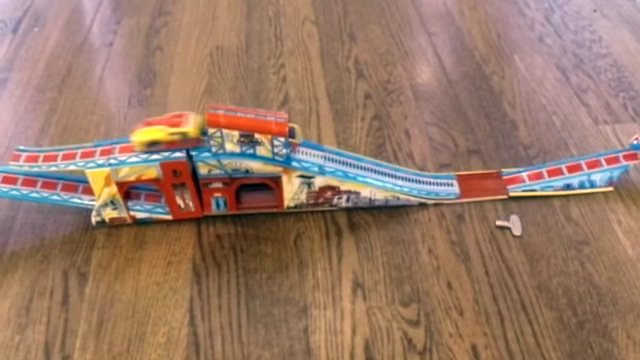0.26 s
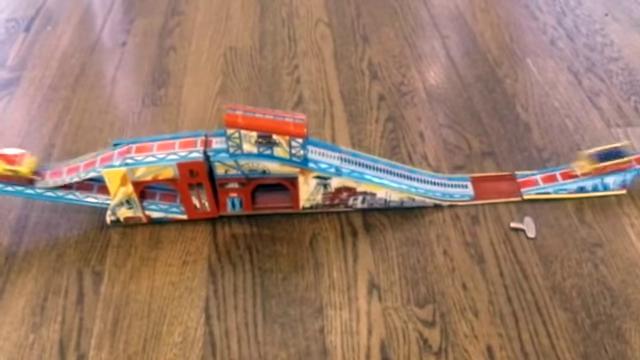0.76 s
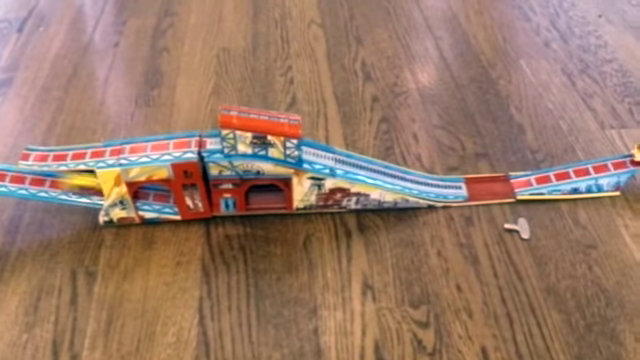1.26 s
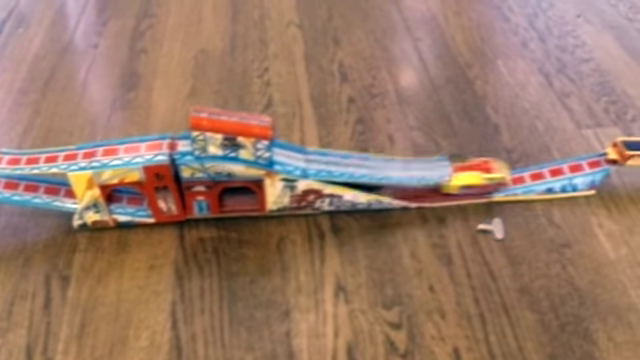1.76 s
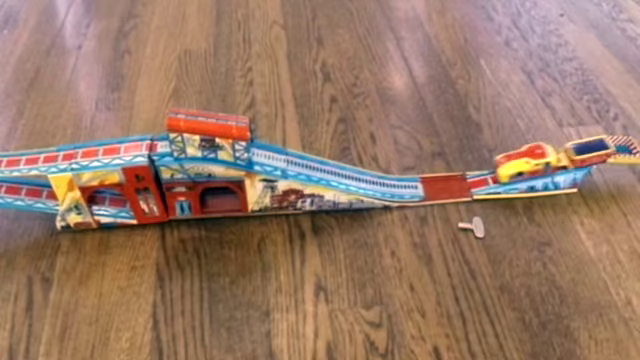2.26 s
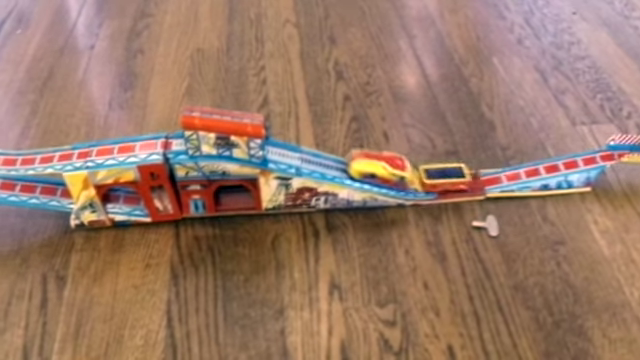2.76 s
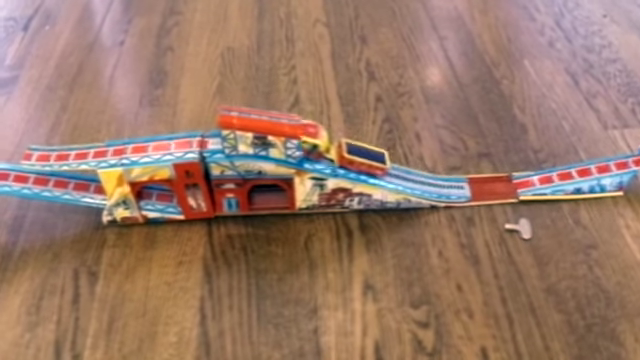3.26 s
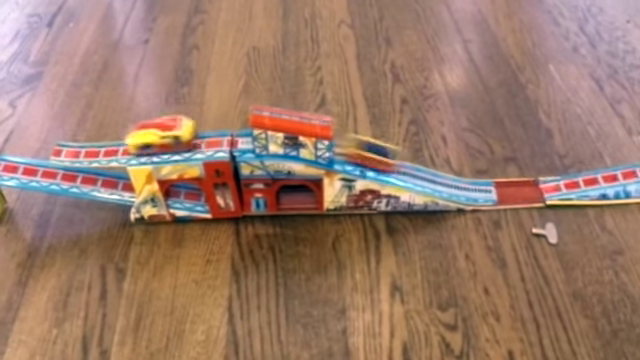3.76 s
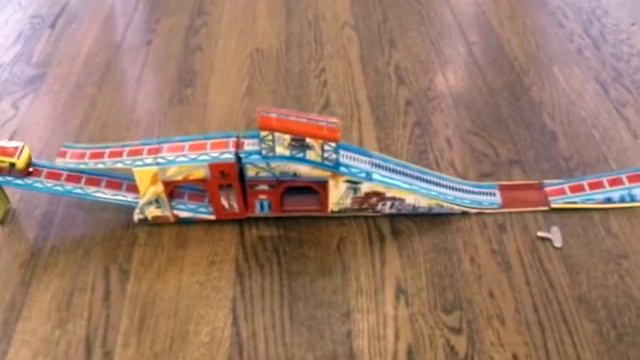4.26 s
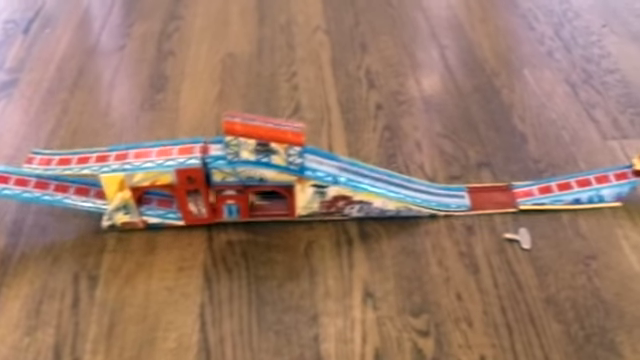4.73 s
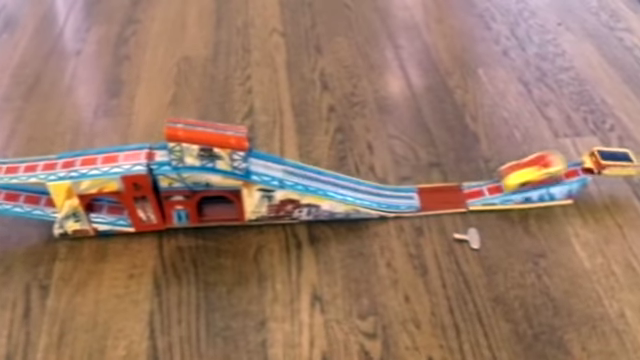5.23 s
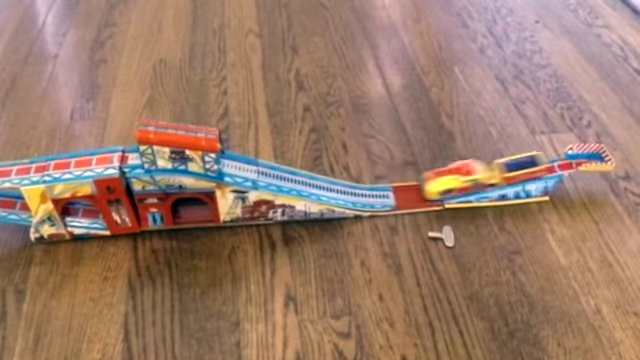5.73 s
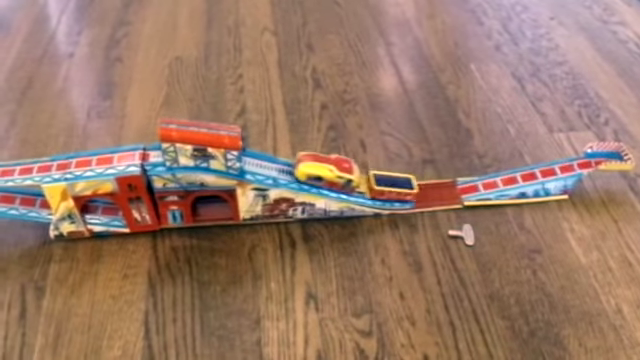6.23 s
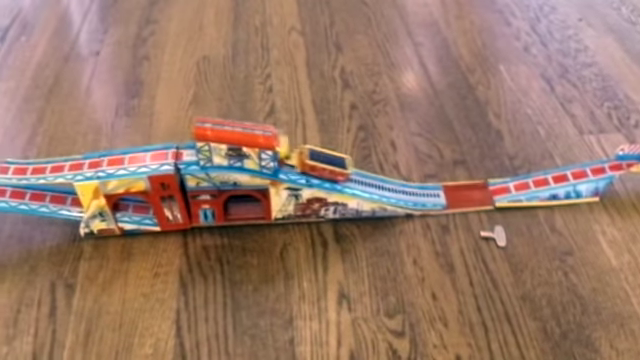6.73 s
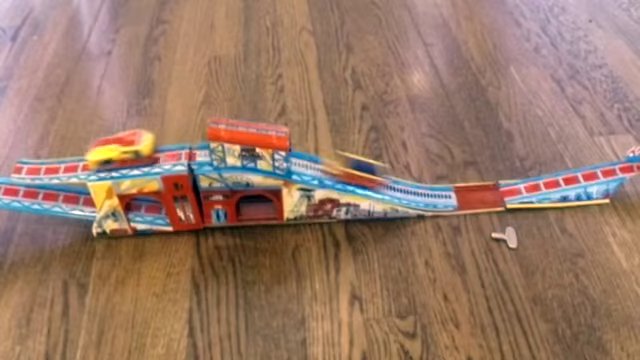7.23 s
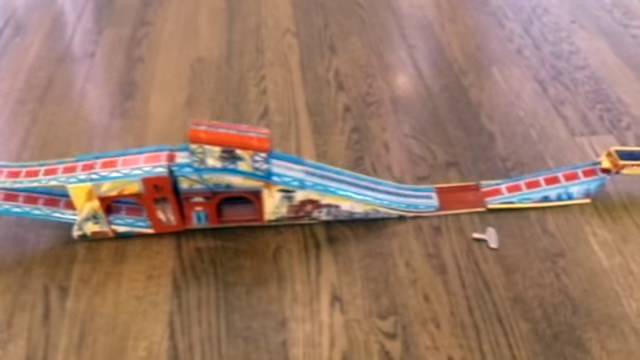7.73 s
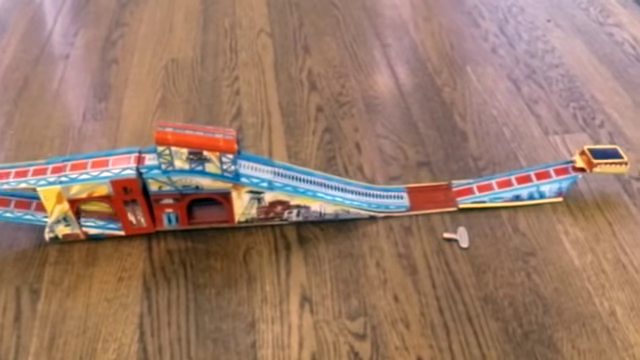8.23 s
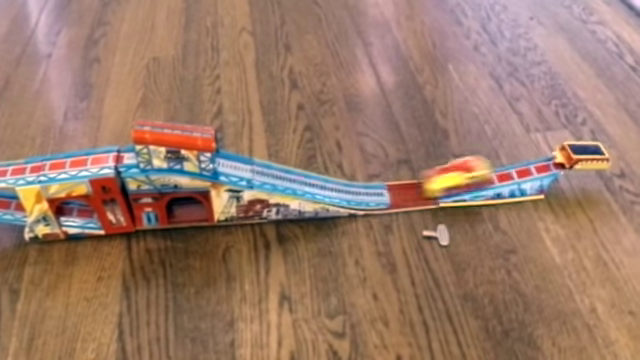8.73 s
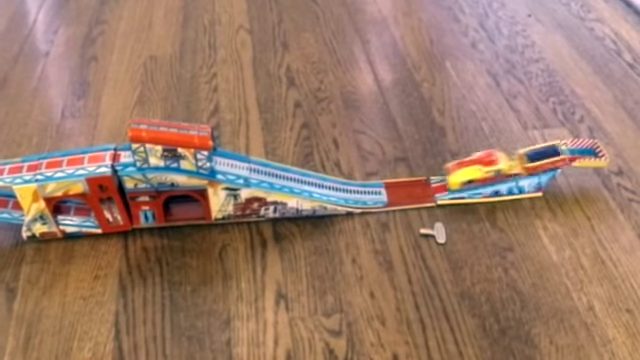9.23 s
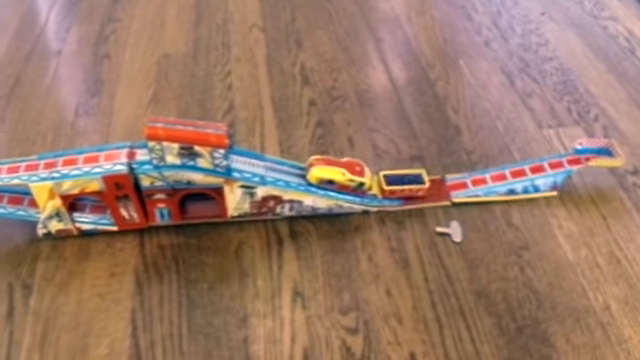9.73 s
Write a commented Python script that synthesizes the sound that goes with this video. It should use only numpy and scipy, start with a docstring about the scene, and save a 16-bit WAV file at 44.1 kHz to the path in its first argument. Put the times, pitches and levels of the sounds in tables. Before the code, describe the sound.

Indoors on a wooden floor, heard close in stereo, low soft air puffs throb at about six per second throughout, with occasional small thumps on the microphone. A bright, gritty clockwork whir is already running and stops at 0.2 s. The tin engine coasts quietly, drops at 0.6 with clacks, rattles and rumbles along the track, slows near 1, knocks at 1.4, snaps through a flap at 1.7, and rings a hollow note near 2. A faint roll swells until it knocks the wagon at 2.4. The whir returns from 2.6 to 3.7 with tiny high squeaks at its start. A second free run follows, with the flap at 5.0 and wagon knock at 5.7. A slightly slower whir fills 5.9 to 7.0, squeaking briefly; the third run starts dropping at 7.4, snaps at 8.6 and couples at 9.3. The slowest whir begins at 9.5 and continues to the end.

```python
"""The whir of a clockwork tin engine hauling a wagon up a toothed ramp is heard first, over slow
regular puffs of air, as from a ceiling fan, throbbing on the microphone. Toothed contacts excite the
shell. Three free runs follow, each with rumble, rattle and knocks over the rail joints, a slowing at
each end of the tin track and a slow roll back to the wagon; the toy then climbs again. Noise-like
contacts ring resonant bodies in a room with a wooden floor; each blade pushes, then pulls, the air."""
import sys
import numpy as np
from scipy import signal
from scipy.fft import rfft, irfft, next_fast_len
from scipy.io import wavfile
from scipy.ndimage import map_coordinates

SR = 44100
rng = np.random.default_rng(int(sys.argv[2]) if len(sys.argv) > 2 else 0)


def put_to_file(sound):
    """Save the sound as 16-bit audio at rate SR, in the file named by the first command-line argument."""
    columns = np.atleast_2d(sound).T  # one column per channel
    safe = np.clip(columns, -1, 1)
    whole_steps = np.round(safe * 32767)
    wavfile.write(sys.argv[1], SR, whole_steps.astype(np.int16))


N = 440559
TIME = np.arange(N) / SR
SIZE = next_fast_len(N + SR)
FREQS = np.arange(SIZE // 2 + 1) * SR / SIZE

# hauls up the toothed ramp, slower each time as the spring runs down:
# (start [s], crest [s], tooth rate before the load slows it [Hz])
CLIMBS = [(-.93, .2, 88), (2.562, 3.71, 71), (5.89, 7.025, 65), (9.482, 10.63, 53)]
# relative level of the whir, one a climb: [dB]
CLIMB_LEVELS = [-20, -20, -20, -21]
# swell of the whir along every climb: (share of the climb [1], level [dB])
CLIMB_SHAPE = [(0, 0.5), (.2, -2), (.52, -3), (.8, -.3), (1, -1.5)]
# places that the engine passes on every free run, in order: [name]
PLACES = ["drop", "left ramp", "left turn", "bottom", "flap", "exit", "right ramp", "right turn", "wagon"]
# one row a lap: (time at each of those places [s])
LAPS = [(.597, .939, 1.08, 1.36, 1.701, 1.750, 1.965, 2.17, 2.399),
        (3.956, 4.299, 4.39, 4.68, 5.040, 5.073, 5.282, 5.52, 5.723),
        (7.381, 7.738, 7.91, 8.26, 8.619, 8.663, 8.884, 9.10, 9.314)]
# speed of the free run at some places: {place: share of top speed [1]}
SPEEDS = {"drop": 0.5, "left ramp": 0.3, "bottom": 0.9, "flap": 0.67, "exit": 0.66, "right ramp": .25,
          "right turn": 0.0091}
# speed left while turning on the left ramp, one a lap: [share of top speed]
TURN_SPEEDS = [0.21, 0.19, 0.038]
# blows at each place on every lap, relative levels:
# {place: (delay [s], crack [dB], hollow clonk [dB], bright clink [dB], jolt to the loose tin [dB])}
BLOWS = { "drop": [(0, -9, -14, -21, -8.5), (.035, -16, -18, -20.5, -2.5), (.128, -2, -23.5, -23.5, -9),
         (.21, -13, -39, -24, -6)], "left ramp": [(0, -17, -19.5, -19, -13)],
         "bottom": [(0, -8, -33, -21, 1), (.205, -1, -18.5, -18.5, -16)],
         "flap": [(0.002, 6, -38, -17.5, -19)], "exit": [(0, -8, -15, -19.5, -10),
         (.064, -10, -19, -18.5, -1)], "right ramp": [(0.00067, -11, -18.5, -15.5, -5.5)],
         "wagon": [(0, -12, -32.5, -37, -2.5), (.101, -5, -25, -25.5, -1.5), (.17, -11, -27, -21, -12.5)]}
# squeaks of the drive wheel as it takes the load: (time [s], level [dB])
SQUEAKS = [(2.618, -22), (2.639, -25), (5.957, -22)]
# stray eddies that thump on the microphone: (time [s], relative level [dB])
THUMPS = [(3.51, -17), (4.074, -13), (4.633, -16.5), (5.903, -26), (6.896, -18), (8.47, -26),
          (8.605, -20.5)]
# turning of the fan, nearly steady: (time [s], blades gone by [count])
BLADES = [(0, .16), (6.13, 35), (7.57, 43), (8.33, 47), (9.39, 53), (10.05, 57)]

# resonances of the tin track: (frequency [Hz], width [Hz], relative level [dB])
TRACK_MODES = [(514, 25, -4), (666, 18, -6), (991, 32, 0), (1088, 33.6, -3.5), (1230, 92, -0.5),
               (1360, 17.5, 3), (1520, 19, -2), (1560, 18, 2.5), (1620, 31, 1.5), (1735, 49, -0.5),
               (2160, 42, -5.5), (2273, 92, 0), (2553, 20, -2), (3120, 13, -16)]
# resonances of the engine's shell: (frequency [Hz], width [Hz], relative level [dB])
SHELL_MODES = [(1247, 54, -2.5), (1586, 83, 0), (1713, 104, -0.5), (2162, 39, -2), (2267, 33, -1),
               (2693, 14, -3), (3170, 35, -5.5), (4370, 51, -7), (5790, 240, -0.5), (6290, 99, 3),
               (6860, 70, 0.5), (7400, 375, -3), (8920, 43, -6.5), (10520, 130, -16.5)]
# hollow ring of a track sheet under a blow: (frequency [Hz], width [Hz], relative level [dB])
CLONK_MODES = [(1232, 28, 7), (1335, 56, 6.5), (1434, 28, 4), (1560, 21, 3), (1900, 24, -2),
               (2010, 64, 4.5), (2320, 41, -1), (2520, 20, -28), (3030, 12, -1.5)]
# broad spectrum of such a blow: (frequency [Hz], relative level [dB])
CLONK_COLOUR = [(100, -16), (450, -15), (800, -24), (1050, -27), (1300, 2), (1700, -17), (2050, -12),
                (2600, -30), (6000, -24), (14000, -50)]
# broad spectrum of the gear contacts: (frequency [Hz], relative level [dB])
WHIR_COLOUR = [(150, -20.5), (400, -14.5), (700, -11.5), (1100, -11.5), (1900, -7.5), (3300, -7.5),
               (4500, -3.5), (6000, 0), (7400, -4.5), (8600, -10.5), (10200, -14), (11300, -46),
               (12200, -22), (15000, -67)]
# broad spectrum of loose tin: (frequency [Hz], relative level [dB])
RATTLE_COLOUR = [(200, -19.5), (500, -23), (800, -11.5), (1500, -8.5), (2800, -6), (4300, -4), (6200, 2.5),
                 (7400, -3.5), (8600, -11.5), (10200, -17.5), (11300, -63), (12200, -29), (15000, -121)]
# broad spectrum of wheels on the track: (frequency [Hz], relative level [dB])
RUMBLE_COLOUR = [(100, -3), (300, -8.5), (480, -7), (740, -10), (1100, -6.5), (1400, 2.5), (1800, 0),
                 (2400, -5.5), (3500, -8), (7000, -30), (14000, -67)]
# broad spectrum of the slow roll: (frequency [Hz], relative level [dB])
CREEP_COLOUR = [(150, -7), (480, -12), (800, -17.5), (1150, -11), (1380, 2), (1580, 1.5), (1800, -6.5),
                (2300, -18), (3000, -19.5), (4500, -23), (5800, -16), (7500, -24.5), (9000, -33.5),
                (14000, -63)]
# broad spectrum of the fan's eddies: (frequency [Hz], relative level [dB])
EDDY_COLOUR = [(10, 3.5), (25, 2), (50, -2.5), (75, -14), (120, -19.5), (200, -35.5), (400, -37),
               (1000, -75)]
# left port minus right port: (frequency [Hz], level difference [dB])
BALANCE = [(60, -0.5), (110, -4.5), (380, -1), (1280, 0), (2360, 3), (4340, -1.5), (7500, -3.5),
           (12000, -0.5)]
# gain on the difference between the two ports: (frequency [Hz], level [dB])
WIDTH = [(200, -17), (380, -9), (690, -3.5), (1280, -0.5), (2360, 2), (4340, -5), (8000, 3.5), (14000, 2)]

# the gears slow as the wagon too comes to hang on the slope:
# share of the climb, spread of that share, share of the tooth rate lost
LOAD_AT, LOAD_SPREAD, LOAD_SLOWING = .4, .08, .16
ENGAGE_S, RELEASE_S = 0.0021, 0.03  # the whir sets in and dies away
# past the crest the engine settles to a coast, then tips over the drop: shares of top speed, then s
CREST_SPEED, COAST_SPEED, SETTLE_S, TIP_S = 0.38, 0.23, 0.13, 0.085
JOLT_S = 0.082  # amplitude decay of a jolt
# level factors (dB) and the powers of the agitation that they multiply
RUMBLE_DB, RUMBLE_POWER, RATTLE_DB, RATTLE_POWER = -24.5, 0.82, -21.5, 1.21
UNEVEN_DB, UNEVEN_HZ = 1.0, 11.6  # rms depth and centre rate of the uneven shaking
CREEP_DB, CREEP_RELEASE_S = -30, 0.025  # gain reached at the wagon, then its decay
RAMP_DB = -37  # start of the right ramp's ring
ROOM_T60_S = 0.47
TOP_HZ = 15000


def clockwork():
    """Forced vibration: tooth impacts of the drive wheel and faster gears shake the shell."""
    tooth_hz, effort = hauling()
    teeth = fade(ticks(tooth_hz, jitter=.25, scatter_db=7.0), decay_s=0.0042)
    gears = fade(ticks(7 * tooth_hz, jitter=.3, scatter_db=2.0), decay_s=0.0039)
    # the wheel grips better and worse as the engine rocks on the rack
    grip = undb(0.86 * note(hz=12, width_hz=5.4))
    envelope = unit(np.sqrt(undb(-28.5) * teeth + gears) * grip)
    chatter = envelope * noise(likeness=0.61)
    shell = body(WHIR_COLOUR, SHELL_MODES, modes_db=1.5)
    return undb(2.5) * through(chatter * effort, shell)


def hauling():
    """Load on a spring motor: tooth rate (Hz) falls partway up, while the whir gain follows the climb."""
    tooth_hz, gain = np.zeros(N), np.zeros(N)
    for (start, crest, hz), db in zip(CLIMBS, CLIMB_LEVELS):
        age = np.maximum(TIME - start, 0)
        way = age / (crest - start)
        load = (1 + np.tanh((way - LOAD_AT) / LOAD_SPREAD)) / 2
        # the rate also holds after the crest, where the gain falls silent
        tooth_hz = np.where(TIME >= start, hz * (1 - LOAD_SLOWING * load), tooth_hz)
        engaged = (1 - np.exp(-age / ENGAGE_S)) * held(start, crest, RELEASE_S)
        shape_db = np.interp(way, *np.transpose(CLIMB_SHAPE))
        gain = gain + engaged * undb(db + shape_db)
    return tooth_hz, gain


def knocks():
    """Impulse excitation: each blow's sharp crack and short clatter ring both track and shell."""
    s, crack_db, clonk_db, clink_db, _ = blows()
    at = (s * SR).astype(int)

    def clatter(db, rise_s, decay_s):
        """Decaying contact energy: a noise burst after each blow."""
        energy = np.bincount(at, undb(db) ** 2, N) * SR * decay_s
        return np.sqrt(fade(fade(energy, rise_s), decay_s)) * noise(likeness=0.56)

    # heavy, dull blows push a whole sheet so that it rings more cleanly
    heavy = np.clip(undb(clonk_db - clink_db), 0, 1.5)
    push = undb(19.0) * np.bincount(at, undb(clonk_db) * heavy, N)
    dull = push + undb(-6) * clatter(clonk_db, rise_s=0.0011, decay_s=0.02)
    clonk = through(dull, body(CLONK_COLOUR, CLONK_MODES, modes_db=-0.5))
    crack = undb(-15.5) * clatter(crack_db, rise_s=0.00018, decay_s=0.0013)
    bright = crack + undb(2) * clatter(clink_db, rise_s=0.001, decay_s=0.011)
    clink = through(bright, body(RATTLE_COLOUR, SHELL_MODES, modes_db=5.5))
    return clonk + clink


def blows():
    """Impact sequence as columns: time (s), then crack, clonk, clink and jolt levels (dB)."""
    found = []
    for place, rows in BLOWS.items():
        for s in passing(place):
            for delay, *levels in rows:
                found.append((s + delay, *levels))
    return np.transpose(found)


def rumble():
    """Rolling contact: small wheels drum on the uneven track sheet; a slow creep only makes it hum."""
    bumps = np.sqrt(fade(ticks(260, jitter=.7, scatter_db=2.5), decay_s=0.0078))
    drumming = bumps * noise(likeness=0.68) * agitation() ** RUMBLE_POWER
    humming = bumps * noise(likeness=0.55) * creeping()
    drumming = through(drumming, body(RUMBLE_COLOUR, TRACK_MODES, modes_db=2.5))
    humming = through(humming, body(CREEP_COLOUR, TRACK_MODES, modes_db=-9.0))
    return undb(RUMBLE_DB) * drumming + humming


def rattle():
    """Random impacts: loose axles and tabs jiggle in the shell as the cars roll."""
    contacts = fade(ticks(380, jitter=.7, scatter_db=1.0), decay_s=0.0047)
    shaking = np.sqrt(contacts) * noise(likeness=0.35) * agitation() ** RATTLE_POWER
    # dents in the track shake the cars now more, now less
    shaking = shaking * undb(UNEVEN_DB * note(UNEVEN_HZ, width_hz=3.8))
    return undb(RATTLE_DB) * through(shaking, body(RATTLE_COLOUR, SHELL_MODES, modes_db=-11.5))


def agitation():
    """Vibration amplitude relative to top speed: speed and decaying jolts add as energies."""
    speed = np.zeros(N)
    for lap, turn_speed in enumerate(TURN_SPEEDS):
        crest, at = CLIMBS[lap][1], dict(zip(PLACES, LAPS[lap]))
        course = [(crest, CREST_SPEED), (crest + SETTLE_S, COAST_SPEED)]
        course += [(at["drop"] - TIP_S, COAST_SPEED), (at["left turn"], turn_speed)]
        course += [(at[place], share) for place, share in SPEEDS.items()]
        speed = speed + np.interp(TIME, *np.transpose(sorted(course)), left=0, right=0)
    s, *_, jolt_db = blows()
    jolts = np.bincount((s * SR).astype(int), undb(jolt_db) ** 2, N)
    # energy decays twice as fast as amplitude
    return np.sqrt(speed ** 2 + fade(jolts * SR * JOLT_S / 2, JOLT_S / 2))


def creeping():
    """Rolling acceleration: the gain grows evenly from the right turn until the wagon is met."""
    gain = 0
    for turn, wagon in zip(passing("right turn"), passing("wagon")):
        growth = np.interp(TIME, [turn - .05, wagon], [0, 1])
        gain = gain + growth * held(0, wagon, CREEP_RELEASE_S)
    return undb(CREEP_DB) * gain


def clicks():
    """Irregular impacts: a tab or burred tooth clicks harder the more the toy is shaken."""
    contacts = np.sqrt(fade(ticks(34, jitter=.9, scatter_db=5.0), decay_s=0.0007))
    _, effort = hauling()
    force = undb(-11) * effort + undb(-33.5) * agitation() ** 0.74
    shell = body(RATTLE_COLOUR, SHELL_MODES, modes_db=1)
    return through(contacts * noise(likeness=0.7) * force, shell)


def squeaks():
    """Frictional vibration: a slipping wheel sings for a moment on one high, unsteady note."""
    swell = 0
    for s, db in SQUEAKS:
        swell = swell + undb(db) * np.exp(-((TIME - s - .005) / 0.012) ** 2)
    return swell * note(hz=8650, width_hz=120)


def ramp(hz, t60_s):
    """Free decay: the right ramp keeps one hollow note after the engine runs onto it."""
    ringing = 0
    for s in passing("right ramp"):
        ringing = ringing + undb(RAMP_DB - 60 * np.abs(TIME - s) / t60_s) * (TIME > s)
    return ringing * note(hz, width_hz=16)


def glints(x, echo_db, sweep_s):
    """Interference: two very short echoes, as from nearby tin walls, wander in delay at random."""
    out = x
    for lag_s in (.0009, .0021):
        path = np.interp(TIME, np.arange(81) / 8, rng.standard_normal(81))
        when = TIME - lag_s - sweep_s * path
        echo = np.array([map_coordinates(port, [when * SR], order=3) for port in x])
        out = out + undb(echo_db) * echo
    return out / np.sqrt(1 + 2 * undb(echo_db) ** 2)


def room(x, wet_db):
    """Diffuse reverberation: four decaying noise tails, as from floor and walls, trade places in turn."""
    t = np.arange(SR // 2) / SR
    out = x
    for place in range(4):
        tail = rng.standard_normal((2, len(t))) * undb(-60 * t / ROOM_T60_S) * (t > .004)
        tail /= np.sqrt(np.sum(tail ** 2, axis=1, keepdims=True))  # unit energy
        # one cycle of the four tails lasts 1.3 s
        nearness = np.maximum(np.cos(2 * np.pi * (TIME / 1.3 - place / 4)), 0)
        out = out + undb(wet_db) * signal.oaconvolve(x * nearness, tail, axes=1)[:, :N]
    return out


def draught():
    """Periodic air pressure: each blade pushes, then pulls, with eddies strongest around the turn."""
    s, blade = np.transpose(BLADES)
    turn = np.interp(TIME, s, blade)
    nearest = np.round(turn).astype(int)
    offset = turn - nearest
    # each blade has its own sharpness and eddy strength
    chance = rng.standard_normal((nearest.max() + 1, 2))[nearest]
    edge = np.sin(np.pi * offset) / (0.16 * np.exp(0.19 * chance[:, 0]))
    puff = -2 * edge / (1 + edge ** 2) * np.cos(np.pi * offset)
    swirl = np.exp(-(offset / 0.18) ** 2) * undb(1.0 * chance[:, 1]) + 0.28
    eddies = through(noise(likeness=0.71) * swirl, body(EDDY_COLOUR))
    # the air also sways back once between two blades
    sway = np.cos(2 * np.pi * 2 * offset)
    pressure = undb(-9.5) * puff + undb(-14.5) * sway + undb(-15) * eddies
    return 0.61 * np.tanh(pressure / 0.6)


def thumps():
    """Pressure pulse: a small eddy gives the ports one quick push and pull."""
    out = 0
    for s, db in THUMPS:
        age = (TIME - s) / 0.0019
        out = out - undb(db) * 2 * age / (1 + age ** 2) ** 1.33
    return undb(2.5) * out


def passing(place):
    """Kinematics: the times (s) at which the engine passes a place, one a lap."""
    return np.array(LAPS)[:, PLACES.index(place)]


def held(start, end, release_s):
    """Exponential release: a gain is on from start to end and dies away after it."""
    return (TIME >= start) * np.exp(-np.maximum(TIME - end, 0) / release_s)


def ticks(hz, jitter, scatter_db):
    """Jittered pulse train: energy of contacts, each a little off in time and force; mean 1."""
    turns = np.cumsum(hz * np.ones(N)) / SR
    count = int(turns[-1])
    late, force = rng.standard_normal((count, 2)).T
    at = np.searchsorted(turns, np.arange(count) + jitter * late)
    energy = np.bincount(at, undb(scatter_db * np.clip(force, -2, 2)) ** 2, N + 1)[:N]
    return energy / energy.mean()


def fade(x, decay_s):
    """First-order relaxation: each push dies away exponentially; the area is kept."""
    pole = np.exp(-1 / (decay_s * SR))
    return signal.lfilter([1 - pole], [1, -pole], x + 1e-18)


def noise(likeness):
    """Partial coherence: white noise at two ports that share a part of it."""
    common, left, right = rng.standard_normal((3, N))
    share = np.clip(likeness, 0, 1)
    return np.sqrt(share) * common + np.sqrt(1 - share) * np.array([left, right])


def note(hz, width_hz):
    """Narrow-band noise: a rough note or wobble from one resonance shaken at random; rms 1."""
    return unit(through(rng.standard_normal(N), np.exp(-((FREQS - hz) / width_hz) ** 2)))


def body(points, modes=(), modes_db=0):
    """Minimum-phase resonance: a broad colour with ringing modes on top, unit power."""
    power = undb(slope(points)) ** 2
    for hz, width, db in modes:
        power = power + undb(db + modes_db) ** 2 / (1 + (2 * (FREQS - hz) / width) ** 2)
    # folding the cepstrum makes the response causal
    cepstrum = irfft(np.log(power), SIZE)
    cepstrum[0] /= 2
    cepstrum[SIZE // 2:] = 0
    return unit(np.exp(rfft(cepstrum)))


def through(x, response):
    """Linear filtering: the spectrum is multiplied by a frequency response."""
    return irfft(rfft(x, SIZE) * response, SIZE)[..., :N]


def slope(points):
    """Spectral interpolation: (Hz, dB) points are joined on a log-frequency axis."""
    hz, db = np.transpose(points)
    return np.interp(np.log(FREQS + 1), np.log(hz), db)


def unit(x):
    """Normalization: scale to rms 1."""
    return x / np.sqrt(np.mean(np.abs(x) ** 2))


def undb(db):
    """Logarithmic level: decibels to amplitude gain."""
    return 10 ** (np.asarray(db) / 20)


def scene():
    """Superposition: the toy in its room and the moving air add at the two ports."""
    tin = glints(clockwork() + rattle() + clicks(), echo_db=-13.0, sweep_s=.00012)
    toy = tin + squeaks() + rumble() + knocks() + ramp(hz=953, t60_s=0.59)
    left, right = undb(-1) * room(toy, wet_db=-2.5)
    sides = np.array([[1], [-1]])
    # long waves reach both ports alike, short ones do not
    difference = through((left - right) / 2, undb(slope(WIDTH)))
    toy = (left + right) / 2 + sides * difference
    return through(toy + draught() + thumps(), undb(sides * slope(BALANCE) / 2))


def record(dry):
    """Band limitation: peaks are clipped at full scale, then the top is cut by a low-pass."""
    low_pass = signal.ellip(10, .2, 80, TOP_HZ, fs=SR, output="sos")
    return signal.sosfilt(low_pass, np.clip(dry, -1, 1))


dry = scene()
out = record(dry)
put_to_file(out)
```